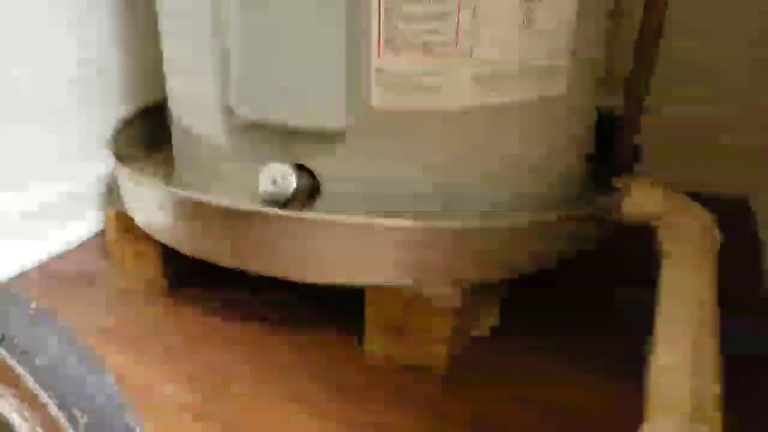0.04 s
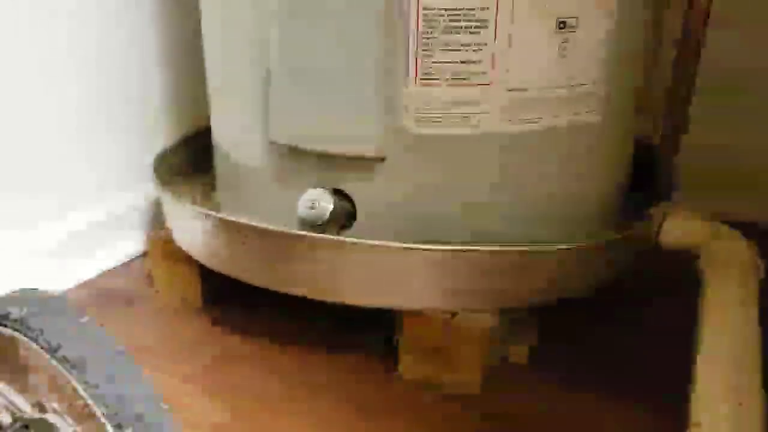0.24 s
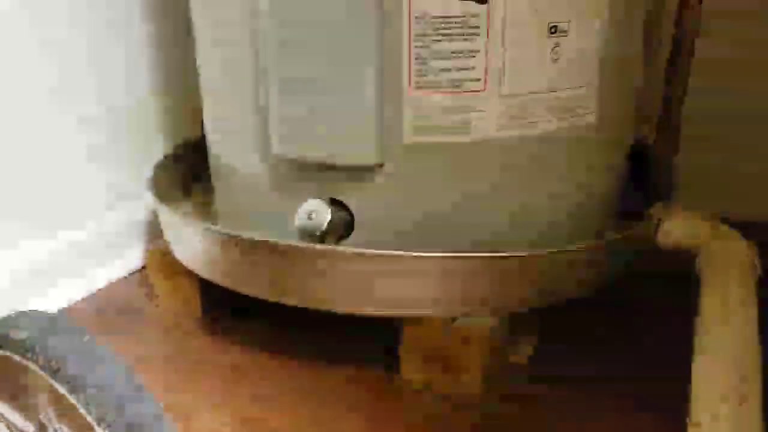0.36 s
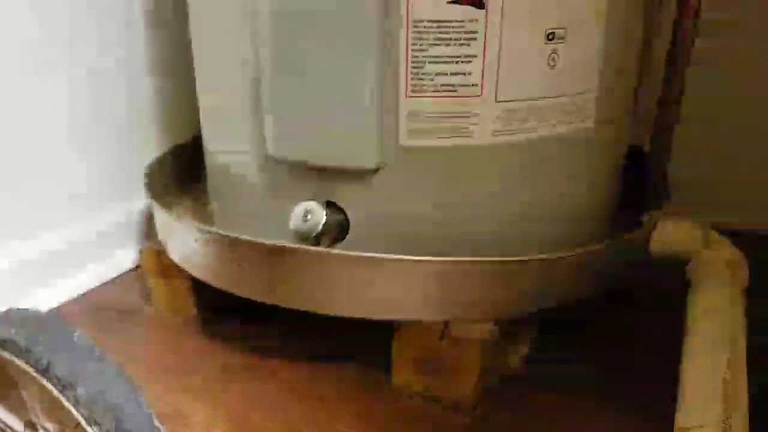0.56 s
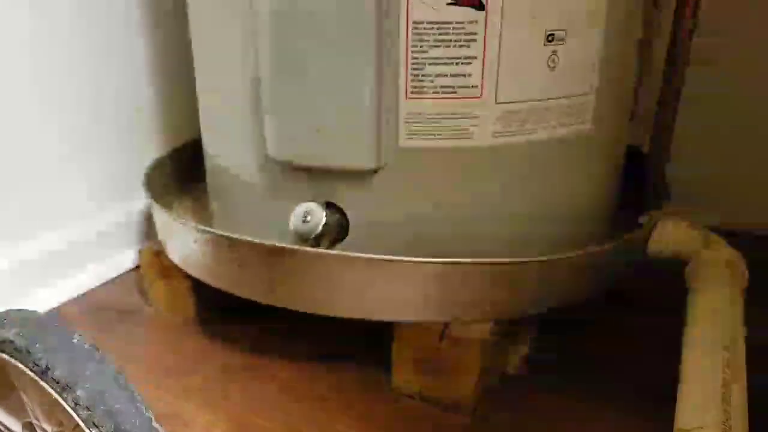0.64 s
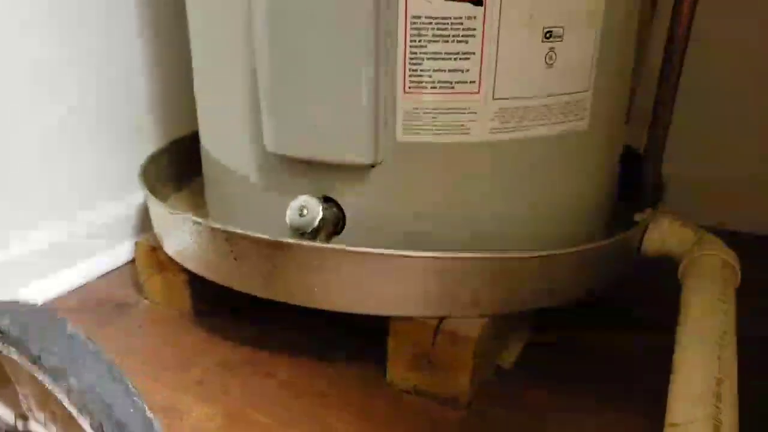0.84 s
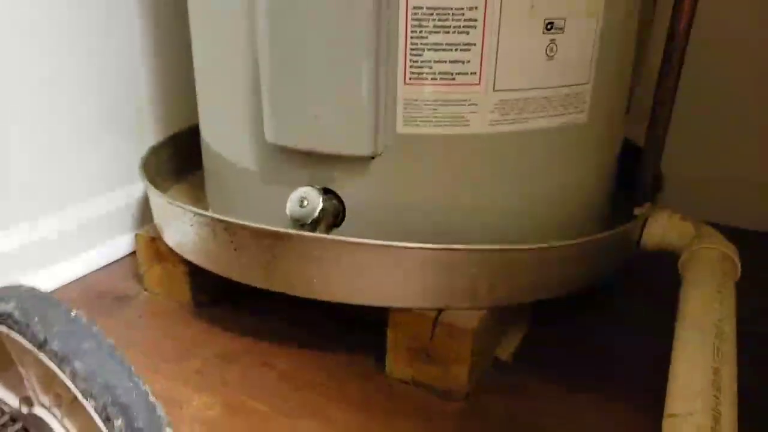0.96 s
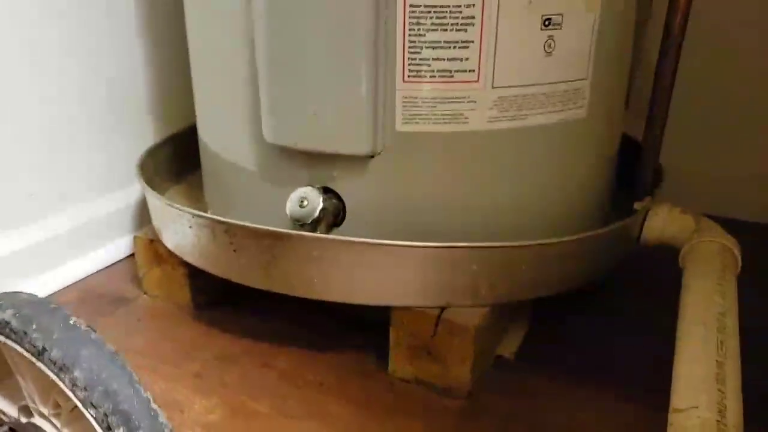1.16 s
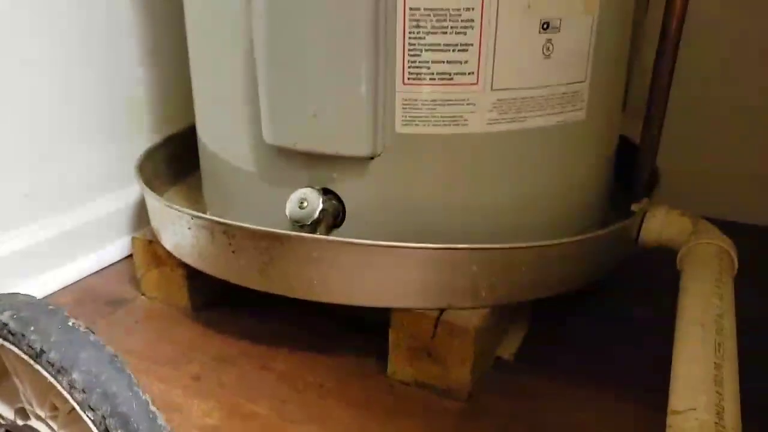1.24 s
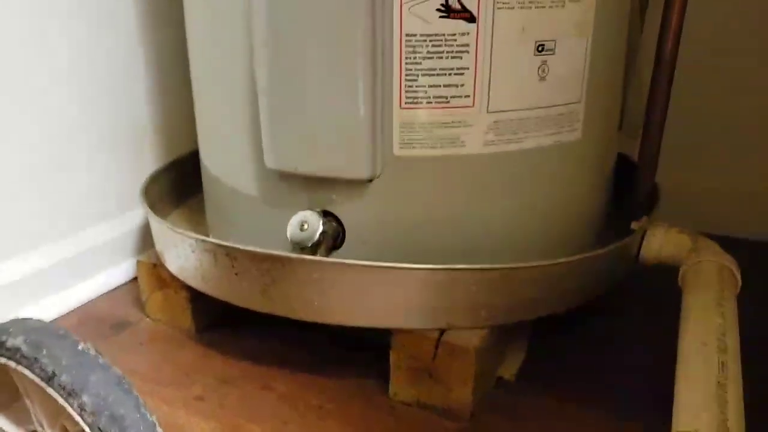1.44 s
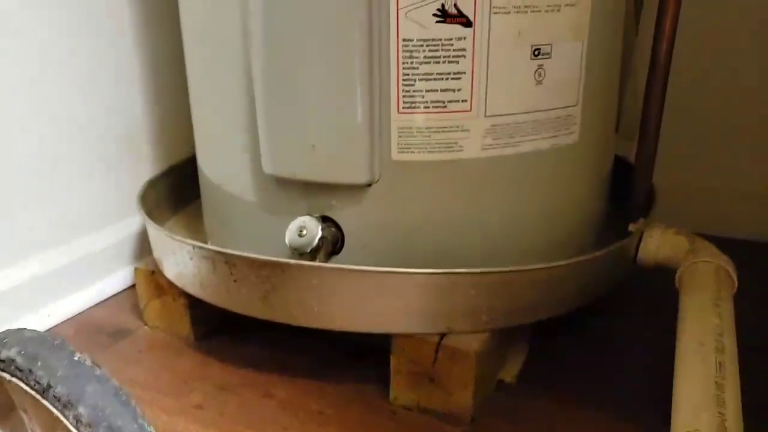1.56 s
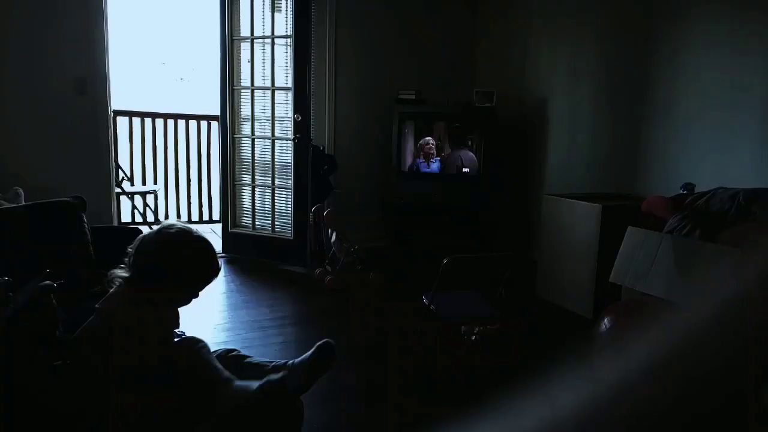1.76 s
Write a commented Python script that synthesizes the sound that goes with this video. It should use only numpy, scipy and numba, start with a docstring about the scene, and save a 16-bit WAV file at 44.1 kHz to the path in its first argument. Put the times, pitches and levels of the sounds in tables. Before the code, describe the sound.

A rodent squeals hoarsely and squeaks, shifting about in a quiet room.

```python
"""A small rodent squealing

From its hiding place in a quiet room, a rodent gives one long hoarse squeal: uneven pulses from its
vocal folds ring in its throat, and clean whistles break through. A falling whistle follows, then a
rustle with claw ticks as it shifts about, and two short rising squeaks. Faint soft thumps sound
nearby over the room's hum, and the sound fades out at the end."""
import sys
import numpy as np
from scipy import signal
from scipy.fft import rfft, irfft
from scipy.io import wavfile
from scipy.ndimage import uniform_filter1d
from numba import njit

SR = 44100
rng = np.random.default_rng(int(sys.argv[2]) if len(sys.argv) > 2 else 0)


def dump_mix(stems):
    """Bounce the given channels to the path in sys.argv[1] as a 16-bit WAV at rate SR."""
    frames = np.atleast_2d(stems).T  # one column per channel
    limited = np.clip(frames, -1, 1)  # hard clip at full scale
    pcm = np.round(limited * 32767).astype(np.int16)
    wavfile.write(sys.argv[1], SR, pcm)


N = 79380
T = np.arange(N) / SR


def squeal():
    """The vocal folds jump between pulse rates; their rough buzz rings in the changing throat."""
    # jumps of the folds: (start [s], pulse rate [Hz])
    jumps = [(0.16, 240.1), (.285, 257.9), (.328, 561.4), (0.361, 275.5), (.385, 588.6), (.45, 258.1),
             (.545, 812.6), (.578, 913), (0.608, 460.2), (0.654, 519.2), (0.691, 446.5)]
    # the throat: (time [s], 3 resonances [Hz], their 3 levels [dB], treble level [dB], bass level [dB])
    throat = [(.166, 1480, 2600, 3970, -52.5, -43, -47.5, -53, -58.5),
              (0.205, 1270, 2950, 4410, -43, -40, -49, -54, -47),
              (0.278, 1370, 3380, 4640, -24, -26.5, -44, -45.5, -35),
              (0.319, 2070, 3580, 4470, -29, -31, -37.5, -41, -37),
              (0.347, 1460, 3230, 5020, -32.5, -31, -36, -34.5, -43.5),
              (0.432, 1720, 3200, 5100, -43.5, -35.5, -42, -31.5, -51),
              (.5, 1800, 3100, 3840, -30.5, -30, -29, -36, -44),
              (0.582, 2020, 2750, 3460, -28.5, -31, -24, -34, -38.5),
              (0.638, 2160, 3560, 4650, -27.5, -31.5, -31.5, -31, -41.5),
              (.7, 2140, 3440, 4660, -27, -28.5, -31, -34, -39),
              (0.746, 1581, 3350, 4276, -37, -39.5, -32, -49, -48.5),
              (.8, 1480, 3168, 4190, -75, -50, -58, -52.5, -72.5)]
    # one value for each throat resonance: (width [Hz])
    widths = [780, 514, 490]
    # hissy treble bands: (centre [Hz], width [Hz])
    treble_bands = [(6600, 550), (9200, 550), (12200, 870)]
    noise_share, bass_hz, bass_width_hz = 0.27, 540, 707
    gate, (*centres, db1, db2, db3, treble_db, bass_db) = curves(throat, edge_s=0.0017)
    starts, rates = np.transpose(jumps)
    buzz = (1 - noise_share) * fold_pulses(starts, rates, gate > 0) + noise_share * rng.standard_normal(N)
    husky = buzz + rng.standard_normal(N)
    bass = ring(ring(buzz, bass_hz, bass_width_hz), bass_hz, bass_width_hz)
    voice = from_db(bass_db) * steady(bass)
    for sign, hz, width, db in zip([1, -1, 1], centres, widths, [db1, db2, db3]):
        voice += sign * from_db(db) * steady(band(buzz, hz, width))
    treble = sum(band(husky, hz, width) for hz, width in treble_bands)
    voice += from_db(treble_db + 1.5 * drift(70)) * steady(treble)
    # a faint hiss swells before the voice catches
    lead_in = from_db(-13) * (T < starts[1]) * np.clip(1 + (T - starts[0]) / 0.032, 0, 1)
    return np.maximum(gate, lead_in) * voice


def fold_pulses(starts, rates, sounding):
    """Each flap of the vocal folds is a short noisy burst, uneven in timing and strength."""
    jitter, flap_s = 0.019, 0.0034
    stretch = np.clip(np.searchsorted(starts, T) - 1, 0, len(starts) - 1)  # which rate applies when
    rate = rates[stretch]
    cycles = np.cumsum(rate * (1 + jitter * drift(60))) / SR
    clicks = np.diff(np.floor(cycles), prepend=0) * np.sqrt(SR / rate)  # one click a cycle
    clicks *= from_db(2.1 * rng.standard_normal(N))
    # each stretch has its own burst shape
    bursts = rng.standard_normal((len(starts), 400)) * np.exp(-np.arange(400) / SR / flap_s)
    flaps = sum(signal.fftconvolve(clicks * (stretch == i), burst)[:N] for i, burst in enumerate(bursts))
    return unit_level(flaps * sounding) * np.sqrt(np.mean(sounding))


def whistles():
    """Whistles and squeaks: nearly pure, wavering tones with harmonics (multiples of the pitch)."""
    # one list per whistle: (time [s], pitch [Hz], harmonic 1 level [dB], harmonic 2 level [dB])
    calls = [
        [(.292, 2011, -28, -45), (.322, 2022, -28, -39), (.33, 2255, -20.5, -38), (.365, 2219, -22, -34.5),
         (.395, 2300, -23.5, -32), (.409, 2335, -33, -32), (.435, 2502, -21, -34), (.449, 2488, -19, -53)],
        [(.451, 3280, -25, -54.5), (.465, 3577, -20.5, -56), (.484, 3626, -22, -51)],
        [(.658, 4796, -27.5, -60), (.715, 4833, -34.5, -60), (.756, 4250, -34.5, -70), (.788, 3044, -31.5, -85),
         (.813, 2986, -48, -85)],
        [(.735, 1987, -36, -72), (.762, 2043, -30.5, -57), (.788, 1517, -36.5, -63), (.813, 1499, -39.5, -58)],
        [(.819, 3400, -48, -55), (.84, 3565, -32.5, -35.5), (.858, 3424, -30.5, -32.5), (.89, 3101, -31, -31),
         (.917, 3075, -43, -43.5), (.923, 4400, -48, -69)],
        [(1.233, 1790, -46.5, -46), (1.283, 1962, -52.5, -61), (1.297, 1676, -38, -37.5),
         (1.315, 1724, -28.5, -35.5), (1.345, 2102, -25.5, -45), (1.377, 2282, -31, -46.5),
         (1.387, 2013, -35, -46), (1.413, 1974, -56, -45)],
        [(1.411, 2770, -34.5, -68), (1.427, 3530, -24.5, -74), (1.437, 4110, -39.5, -68)],
    ]
    # upper harmonics: (pitch [Hz], harmonic 3 compared with 2 [dB], drop per further harmonic [dB])
    upper = [(1750, -2, 3), (2200, -9, 3), (3200, -19, 17.5)]
    pitches, thirds, drops = np.transpose(upper)
    dip_hz, dip_width_hz, dip_db = 11200, 1500, 12  # the upper harmonics are weak here
    waver = 1 + 0.004 * drift(80)
    flickers = [2.8 * drift(120) for _ in range(8)]
    out = 0
    for call in calls:
        gate, (hz, db1, db2) = curves(call, edge_s=0.0015)
        phase = 2 * np.pi * np.cumsum(hz * waver) / SR
        db3 = db2 + np.interp(hz, pitches, thirds)
        drop_db = np.interp(hz, pitches, drops)
        for k, flicker in enumerate(flickers, start=1):
            if k < 3:
                db = db1 if k == 1 else db2
            else:
                dip = dip_db * np.exp(-((k * hz - dip_hz) / dip_width_hz) ** 2)
                db = db3 - drop_db * (k - 3) - dip
            gain = np.sqrt(2) * from_db(db + np.sqrt(k - 0.8) * flicker)  # higher ones flicker more
            out += gate * (k * hz < SR / 2) * gain * np.sin(k * phase)
    return out


def rustle():
    """The animal shifts about, making clumps of tiny uneven crackles."""
    # loudness of the rustle: (time [s], level [dB])
    loudness = [(.94, -63), (1.04, -51), (1.2, -47), (1.27, -40), (1.32, -49.5), (1.44, -46), (1.55, -64),
                (1.75, -67)]
    # its tone colour: (frequency [Hz], relative level [dB])
    colour = [(120, -10), (200, -9), (1210, -11.5), (4100, -11), (15500, -17)]
    crackles_per_s = 5000
    gate, (db,) = curves(loudness, edge_s=0.032)
    sizes = from_db(1.6 * np.minimum(rng.exponential(1, N), 5)) * rng.choice([-1, 1], N)
    crackles = sizes * (rng.random(N) < crackles_per_s / SR)
    hiss = 0.47 * rng.standard_normal(N)
    return gate * from_db(db + 2.57 * drift(41)) * coloured(crackles + hiss, colour)


def claw_ticks():
    """Claws tap, each with a high tick that dies at once."""
    # the taps: (time [s], tone level [dB], pitch [Hz])
    taps = [(1.072, -43, 4300), (1.1295, -44, 4000), (1.216, -45, 2900), (1.358, -43, 3600),
            (1.624, -59, 1800), (1.696, -60, 1900)]
    return knocks(taps, ring_s=0.03)


def thumps():
    """Soft, low knocks nearby."""
    # the knocks: (time [s], tone level [dB], pitch [Hz])
    hits = [(1.25, -56, 158), (1.463, -55, 240), (1.604, -58.5, 294)]
    return knocks(hits, ring_s=0.22)


def room_hum():
    """The room's faint, deep noise, wavering a little in level."""
    # its tone colour: (frequency [Hz], relative level [dB])
    colour = [(15, -23), (25, -6.5), (215, -12.5), (722, -22.5), (1020, -33), (15500, -25)]
    return from_db(-62.5 + 1.1 * drift(15)) * coloured(rng.standard_normal(N), colour)


def knocks(hits, ring_s, puff_db=8):
    """Each hit is a tone inside a louder puff of noise; both fall 60 dB in ring_s."""
    out = 0
    for start, db, hz in hits:
        age = np.maximum(T - start, 0)
        puff = from_db(puff_db) * unit_level(band(rng.standard_normal(N), hz, hz))
        tone = np.sin(2 * np.pi * hz * age)
        attack = np.minimum(age / 0.003, 1)
        out += attack * from_db(db - 60 * age / ring_s) * (tone + puff)
    return out


def from_db(db):
    """Turn decibels into a multiplier."""
    return 10 ** (np.asarray(db) / 20)


def unit_level(x):
    """Scale a signal to an average (rms) level of 1."""
    return x / np.sqrt(np.mean(x ** 2) + 1e-20)


def steady(x):
    """Hold the level near 1, averaged over about 30 ms."""
    return x / np.sqrt(uniform_filter1d(x ** 2, size=1300) + 1e-12)


def curves(rows, edge_s):
    """A gate that is on from a table's first time to its last, and its columns as curves in time."""
    times, *columns = np.transpose(rows)
    gate = np.clip(np.minimum(T - times[0], times[-1] - T) / edge_s + 1, 0, 1)
    return gate, [np.interp(T, times, column) for column in columns]


def drift(rate_hz):
    """A smooth random wobble of size about 1, mostly slower than rate_hz."""
    r = np.exp(-2 * np.pi * rate_hz / SR)
    smooth = signal.lfilter([1], [1, -2 * r, r * r], rng.standard_normal(N + 8000))
    return unit_level(smooth[8000:])


def coloured(x, colour):
    """Give noise a tone colour and a level of 1, with nothing below 20 Hz."""
    hz = np.maximum(np.arange(N // 2 + 1) * SR / N, 1)
    points_hz, points_db = np.transpose(colour)
    db = np.interp(np.log(hz), np.log(points_hz), points_db)
    return unit_level(irfft(rfft(x) * from_db(db) * (hz > 20), N))


def band(x, hz, width_hz):
    """Keep the sound near hz: two resonances in a row, the second twice as wide."""
    return ring(ring(x, hz, width_hz), hz, 2 * width_hz)


def ring(x, hz, width_hz):
    """A resonance: it passes sound at hz, which may move, and weakens the rest."""
    r = np.exp(-np.pi * width_hz / SR)
    tuning = 2 * r * np.cos(2 * np.pi * hz / SR) * np.ones(N)
    return (1 - r * r) / 2 * feed_back(x, tuning, r * r)


@njit
def feed_back(x, tuning, decay):
    """Feeding the last two outputs back in makes a signal ring."""
    y = np.zeros(len(x))
    for i in range(2, len(x)):
        y[i] = x[i] - x[i - 2] + tuning[i] * y[i - 1] - decay * y[i - 2]
    return y


def scene():
    """The animal, the room's hum and the thumps, mixed to one channel."""
    animal = whistles() + squeal() + rustle() + claw_ticks()
    return (animal + room_hum() + thumps())[None]


def record(dry):
    """Fade quickly to silence at the end and cut the highest treble."""
    fade_start_s, fade_db_per_s, cutoff_hz = 1.712, 1498, 15800
    fade = from_db(-fade_db_per_s * np.maximum(T - fade_start_s, 0))
    return signal.sosfilt(signal.cheby2(18, 70, cutoff_hz, fs=SR, output="sos"), dry * fade)


dry = scene()
out = record(dry)
dump_mix(out)
```